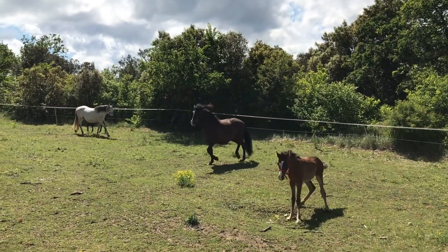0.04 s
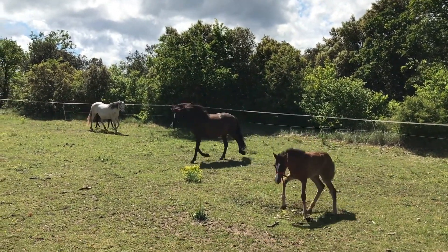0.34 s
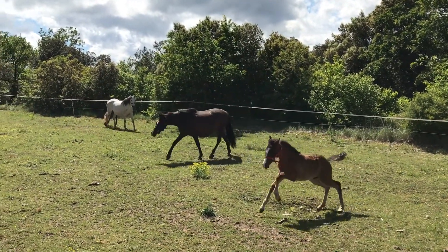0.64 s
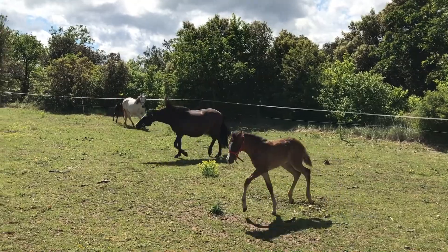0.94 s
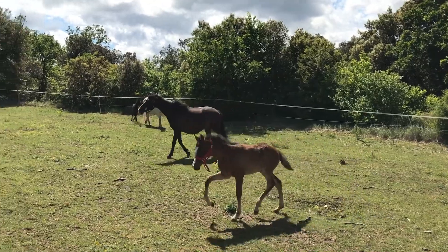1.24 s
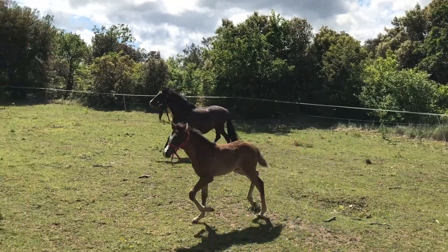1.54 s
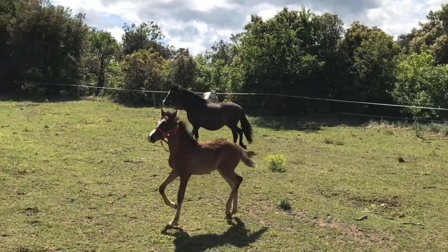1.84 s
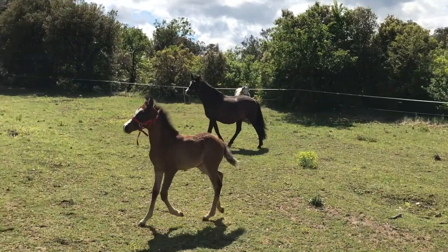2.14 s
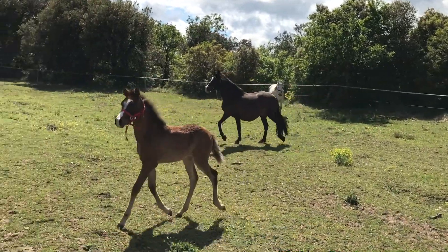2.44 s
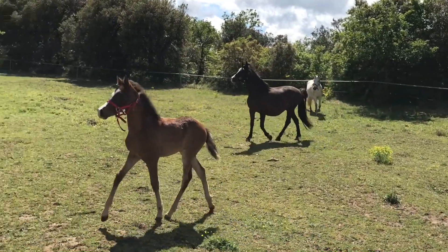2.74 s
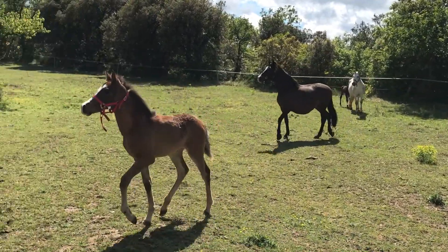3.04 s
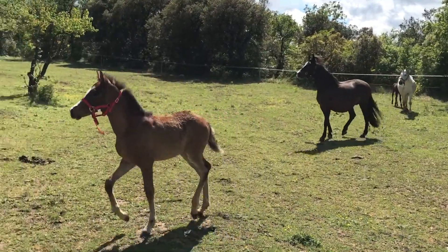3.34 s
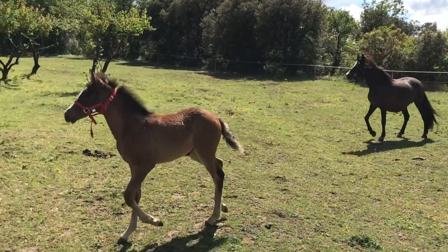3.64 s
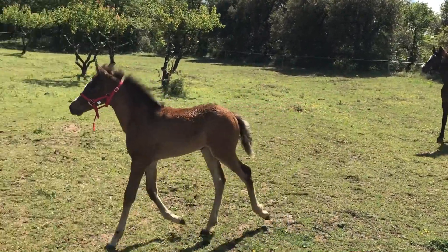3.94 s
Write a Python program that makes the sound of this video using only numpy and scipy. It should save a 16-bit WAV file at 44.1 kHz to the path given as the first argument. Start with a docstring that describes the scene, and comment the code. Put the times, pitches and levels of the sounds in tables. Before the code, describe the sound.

A distant horse whinnies over gusting wind, after a foal's light hoof knocks and halter jingles.

```python
"""A dry, windy field with a tree line. A foal trots past: hooves knock on hard turf, stalks swish and
snap, and the metal rings of its halter jingle. Gusts rumble and buffet the microphone.
From two seconds on a horse whinnies far off with two voices at once: a high whistle, then a shaking
low voice under it, echoed by the trees. Small birds call faintly over a hiss of foliage."""
import sys
import numpy as np
from scipy import signal
from scipy.fft import rfft, irfft
from scipy.io import wavfile
from scipy.ndimage import uniform_filter1d

SR = 44100
rng = np.random.default_rng(int(sys.argv[2]) if len(sys.argv) > 2 else 0)


def to_wav(s):
    """Save 16-bit WAV."""
    ch = np.atleast_2d(s).T  # columns
    pcm = np.round(np.clip(ch, -1, 1) * 32767)  # PCM
    wavfile.write(sys.argv[1], SR, pcm.astype(np.int16))


N = 176400

# Tone of the distant leaves. Each row: frequency in Hz, gain in dB.
FOLIAGE_EQ = [(240, -45), (400, -2), (1100, -3.5), (1850, -7.5), (4030, -13), (4840, -17), (6580, -16.5),
              (12100, -23.5), (15500, -26)]
# Bird whistles. Each row: start and length in seconds, first and last pitch in Hz, level in dB.
BIRD_CALLS = [(0.165, 0.07, 2300, 2256, -70), (0.611, 0.071, 1715, 1660, -77),
              (1.318, 0.29, 5500, 5150, -86), (3.247, 0.24, 6960, 6970, -80),
              (3.607, 0.14, 7290, 7050, -84.5), (3.75, .16, 7060, 7040, -87),
              (3.945, 0.077, 5500, 5720, -80)]

# Rise and fall of the wind. Each row: time in seconds, rumble level in dB.
GUSTS = [(0.0, -40), (0.58, -43), (0.61, -30.5), (0.66, -34), (0.69, -48), (1.0, -55.5), (1.04, -46),
         (1.12, -56.5), (1.3, -41.5), (1.43, -51), (1.46, -36), (1.54, -34), (1.73, -34.5), (1.9, -29),
         (2.05, -46), (2.08, -37), (2.32, -42), (2.71, -41), (2.81, -32.5), (2.83, -37), (2.92, -31.5),
         (3.11, -47), (3.22, -42.5), (3.42, -47.5), (3.64, -37), (3.69, -29), (3.74, -35), (3.78, -28.5),
         (3.97, -40.5), (4.0, -36.5)]
# Tone of the wind rumble. Each row: frequency in Hz, gain in dB.
RUMBLE_EQ = [(20, 4), (35, -5.5), (52, 7), (75, 7), (130, -3.5), (200, -12), (300, -24.5), (450, -41),
             (900, -75.5), (3000, -114)]
# Sharp slaps of wind. Each row: start and length in seconds, level in dB, upper edge in Hz.
BUFFETS = [(0, 0.086, -44.5, 320), (0.239, 0.054, -42.5, 238), (0.599, 0.092, -39.5, 257),
           (1.29, 0.038, -42.5, 328), (1.54, 0.18, -38.5, 276), (1.671, 0.047, -37, 400),
           (1.704, 0.028, -36.5, 410), (1.752, 0.16, -36, 308), (1.858, 0.015, -31, 530),
           (1.87, 0.14, -42, 263), (2.07, 0.053, -39, 292), (2.723, 0.067, -42, 330),
           (2.795, 0.013, -32.5, 390), (2.876, 0.027, -39, 333), (2.912, 0.076, -59, 257),
           (3.651, 0.075, -36.5, 284), (3.738, 0.015, -41.5, 620), (3.752, 0.035, -25.5, 480),
           (3.81, 0.041, -34, 323), (3.846, 0.059, -44.5, 275)]

# Melody of the horse's high voice. Each row: time in seconds, pitch in Hz.
WHISTLE_PITCH = [(2.06, 1500), (2.1, 1720), (2.15, 1815), (2.33, 1860), (2.45, 1980), (2.6, 2040),
                 (2.9, 1935), (3.3, 1879), (3.75, 1792), (3.87, 1600), (4.0, 1496)]
# Envelope of the high voice. Each row: time in seconds, relative level in dB.
WHISTLE_LEVEL = [(2.0, -130), (2.06, -72), (2.14, -62), (2.21, -58), (2.33, -55.5), (2.44, -66), (2.7, -63),
                 (2.94, -60.5), (3.2, -61.5), (3.55, -60), (3.76, -63.5), (4.0, -69)]
# Overtone about a fifth above the high voice. Each row: time in seconds, relative level in dB.
OVERTONE_LEVEL = [(2.1, -100), (2.25, -74), (2.42, -72.5), (2.68, -76), (2.9, -68), (4.0, -93)]
# The horse's low voice. Each row: time in seconds, pitch in Hz, relative level in dB.
LOW_VOICE = [(2.05, 480, -130), (2.12, 485, -80), (2.42, 514, -63.5), (2.58, 491.5, -59.5),
             (2.85, 420.5, -61), (3.1, 400, -60), (3.4, 386.2, -58), (3.75, 362.8, -62), (3.88, 311, -63),
             (4.0, 310, -75.5)]
# Throat resonances. Each row: base frequency in Hz, width in Hz, gain in dB.
FORMANTS = [(400, 78, -6), (627, 34, 1.5), (1295, 158, -2.5), (1600, 96, -5), (1873, 185, -3),
            (2300, 71, -5), (2960, 108, -6.5), (3285, 490, -10.5), (4117, 100, -11)]
# Tuning of the throat. Each row: time in seconds, factor on the resonance frequencies.
THROAT_TUNING = [(2.1, 0.79), (2.48, 1.035), (2.7, 0.97), (3.0, 1.046), (3.5, .995), (4.0, 0.94)]
# Shakes of the whinny. Each row: time of the crest in seconds, accent on the whistle in dB.
SHAKES = [(2.42, 2.5), (2.56, -2), (2.69, 1.5), (2.82, 3), (2.955, 5.5), (3.09, -1), (3.23, -1.5),
          (3.36, -1), (3.495, 3), (3.63, -0.5), (3.76, 1), (3.89, 1.5), (4.03, -3)]

# Strides through grass. Each row: start and length in seconds, relative stalk and turf levels in dB.
SWISHES = [(0.051, 0.048, -63, -78), (0.07, 0.17, -70, -71), (0.464, 0.12, -71.5, -62.5),
           (0.784, 0.041, -69, -63.5), (0.824, 0.15, -74.5, -63), (0.964, 0.11, -69, -57),
           (1.05, 0.079, -68.5, -63.5), (1.173, 0.046, -72, -68), (1.273, 0.033, -68, -72.5),
           (1.401, 0.18, -78.5, -66), (1.796, 0.046, -71, -62.5), (2.118, 0.078, -78.5, -70),
           (2.293, 0.14, -79, -97), (2.717, 0.19, -72, -84), (2.937, 0.064, -64.5, -63.5),
           (3.209, 0.041, -67.5, -80), (3.6, 0.065, -74.5, -63.5)]
# Tone of the crackling stalks. Each row: frequency in Hz, gain in dB.
STALK_EQ = [(2000, -8), (3000, 4.5), (4200, 3), (7000, -3.5), (10000, -5), (15000, -4.5)]
# Tone of the scuffed turf. Each row: frequency in Hz, gain in dB.
TURF_EQ = [(300, -3), (700, -9), (1100, 8.5), (1600, 2.5), (2300, -3), (4000, -11.5), (9000, -72)]
# Breaking stalks. Each row: start in seconds, level in dB, low and high edge in Hz, decay in seconds.
SNAPS = [(0.053, -57, 1500, 7450, 0.0055), (0.0965, -59.5, 2000, 14900, 0.00051),
         (0.169, -65, 3000, 12000, 0.0065), (0.482, -57, 2500, 14000, 0.0044),
         (1.021, -62, 3000, 14000, .004), (1.066, -62, 3000, 11000, .006),
         (1.276, -66, 3000, 14900, 0.0016), (1.823, -62.5, 3550, 12000, 0.0043),
         (2.864, -60, 2500, 9900, .003), (2.949, -68, 3000, 10000, 0.0018)]
# Hoof knocks. Each row: start in seconds, level in dB, rough centre in Hz, decay in seconds.
HOOF_KNOCKS = [(0.054, -59, 1520, 0.074), (.172, -57, 2350, 0.0067), (0.404, -44, 1780, 0.00089),
               (.795, -52, 890, 0.0037), (1.182, -54, 1000, 0.0036), (1.756, -40.5, 1100, 0.0029),
               (2.078, -61, 1020, 0.0035), (3.224, -47, 990, 0.002), (3.768, -49.5, 940, 0.0057)]
# Modes of the halter's metal. Each row: part (0 and 1 are rings, 2 is the buckle), frequency in Hz,
# gain in dB, seconds to fall by 60 dB.
HALTER_MODES = [(0, 6263, 0, .25), (0, 6291, -2, .2), (0, 6150, -4, .025), (0, 11520, -4, .03),
                (0, 11637, -3, .05), (0, 11795, -2, .06), (1, 6434, -5, .06), (1, 6575, -2, .07),
                (1, 6610, 0, .08), (1, 6720, -4, .03), (1, 12200, -3, .05), (1, 12326, -3, .05),
                (1, 12520, -5, .025), (2, 5190, 0, .055), (2, 9158, -9, .045)]
# Clinks. Each row: start and rattle decay in seconds, levels of first ring, second ring, buckle in dB.
CLINKS = [(0.038, 0.004, -69.5, -73, -99), (0.407, 0.05, -88, -53.5, -99), (0.448, 0.011, -75, -53.5, -99),
          (0.482, 0.032, -69, -79, -99), (0.684, 0.0093, -81, -66.5, -99),
          (0.7047, 0.0058, -50, -57.5, -86), (0.757, 0.047, -73, -68, -99), (0.827, 0.016, -72, -66, -99),
          (0.884, 0.033, -66, -81, -99), (0.904, 0.031, -56, -64, -99), (0.952, 0.0059, -59, -61, -99),
          (.996, 0.018, -51.5, -74, -84), (1.009, 0.0059, -55, -47.5, -51), (1.043, 0.057, -56, -60, -99),
          (1.095, 0.0072, -67, -60, -88), (1.165, 0.0087, -63.5, -88, -99), (1.202, 0.0086, -57, -67, -99),
          (1.3, 0.0026, -56, -66, -99), (1.342, 0.006, -68, -71, -99), (1.516, 0.022, -78, -71, -99),
          (2.037, 0.0041, -77, -68, -99), (2.188, 0.042, -64.5, -74, -99), (2.354, 0.016, -71.5, -82, -79),
          (2.417, 0.0028, -83, -71.5, -99), (3.121, 0.0071, -68, -74, -99),
          (3.149, 0.0015, -66, -68.5, -99)]


def undb(db):
    """Decibels to gain."""
    return 10 ** (np.asarray(db) / 20)


def unit(x):
    """Scale to rms 1."""
    return x / np.sqrt(np.mean(x ** 2) + 1e-20)


def curve(table, axis=1):
    """One column of a table, joined by straight lines in time."""
    rows = np.array(table)
    return np.interp(np.arange(N) / SR, rows[:, 0], rows[:, axis])


def add(out, start, x):
    """Mix a sound in at its start time."""
    i = max(int(start * SR), 0)
    out[i:i + len(x)] += x[:max(len(out) - i, 0)]


def colour(x, points):
    """EQ a sound through (Hz, dB) points."""
    hz, db = np.array(points).T
    f = np.fft.rfftfreq(len(x), 1 / SR) + 1
    return irfft(rfft(x) * undb(np.interp(np.log(f), np.log(hz), db)), len(x))


def band(x, lo_hz, hi_hz, order=2):
    """Causal band-pass."""
    sos = signal.butter(order, [lo_hz, min(hi_hz, SR / 2 - 1)], "band", fs=SR, output="sos")
    return signal.sosfilt(sos, x)


def resonance(x, hz, width):
    """Band-pass whose centre moves."""
    turn = np.exp(2j * np.pi * np.cumsum(hz) / SR)
    return np.real(turn * signal.sosfilt(signal.butter(2, width / 2, fs=SR, output="sos"), x / turn))


def wander(per_s):
    """Smooth random modulation at rms 1."""
    hold = int(SR / per_s)
    steps = rng.standard_normal(N)[np.arange(N) // hold]
    return unit(uniform_filter1d(uniform_filter1d(steps, hold), hold))


def swell(length):
    """A rounded rise and fall."""
    return unit(np.sin(np.linspace(0, np.pi, int(length * SR))))


def foliage(level_db=-71):
    """A soft bed of hiss from distant leaves."""
    return unit(colour(rng.standard_normal(N), FOLIAGE_EQ)) * undb(level_db + 0.75 * wander(5.2))


def birds(waver_depth=0.0052):
    """Thin gliding whistles with a slight waver."""
    out, waver = np.zeros(N), 1 + waver_depth * wander(130)
    for start, length, from_hz, to_hz, db in BIRD_CALLS:
        shape = swell(length)
        hz = np.linspace(from_hz, to_hz, len(shape)) * waver[:len(shape)]
        add(out, start, undb(db) * shape * unit(np.sin(2 * np.pi * np.cumsum(hz) / SR)))
    return out


def wind(lull_db=-55.5, buffet_peak_hz=124, flutter_db=7.5, low_cut_hz=30):
    """Rumble on the microphone, brighter in gusts, with fluttering buffets on top."""
    gust_db, flow = curve(GUSTS), colour(rng.standard_normal(N), RUMBLE_EQ)
    flow /= np.sqrt(uniform_filter1d(flow ** 2, SR // 10) + 1e-20)  # held even, so the gusts lead
    upper = signal.sosfiltfilt(signal.butter(2, 140, "high", fs=SR, output="sos"), flow)
    brightness = undb(0.18 * (gust_db - lull_db) + 4 * wander(30.38))
    out = (flow - upper + upper * brightness) * undb(gust_db)
    for start, length, db, top_hz in BUFFETS:
        eq = [(buffet_peak_hz / 3, -20), (buffet_peak_hz, 0), (top_hz * 0.73, -3),
              (top_hz * 1.247, -15), (top_hz * 1.91, -32), (top_hz * 8, -70), (top_hz * 20, -100)]
        shape = swell(length)
        eddies = colour(rng.standard_normal(SR // 2), eq)[:len(shape)]
        flutter = undb(flutter_db * np.tanh(wander(176)))[:len(shape)]
        add(out, start, undb(db) * unit(eddies * flutter * shape))
    return signal.sosfilt(signal.butter(5, low_cut_hz, "high", fs=SR, output="sos"), out)


def trees(x, t60_s=0.68, wet_db=-1.5):
    """The direct sound plus its diffuse echo from the tree line."""
    t = np.arange(SR) / SR
    tail = rng.standard_normal(SR) * undb(-60 * t / t60_s) * (1 - np.exp(-t / 0.0027))
    return x + undb(wet_db) * signal.fftconvolve(x, tail / np.linalg.norm(tail))[:N]


def low_voice(phase, bend, roughness=0.8):
    """Buzzy pulses and puffs of breath ring the shifting resonances of the throat."""
    pulses = unit(sum(np.cos(k * phase) for k in range(1, 14)))
    breath = roughness * (1 + np.cos(phase)) * rng.standard_normal(N)
    tuning = curve(THROAT_TUNING) * (1 + 0.005 * bend + 0.004 * wander(14))
    voice = sum(undb(db) * resonance(pulses + breath, hz * tuning, width) for hz, width, db in FORMANTS)
    return unit(voice) * undb(curve(LOW_VOICE, axis=2))


def high_voice(phase, low_phase, shaking, rasp_depth=0.5, overtone_ratio=1.515):
    """A whistle and its overtone; as the shaking sets in, it rasps and the low voice adds a sideband."""
    tone = np.sin(phase) * undb(curve(SHAKES))
    sideband = band(np.sin(phase + low_phase), 2184, 2400, order=1) * undb(-2.5 + 4.2 * wander(21.927))
    rasp = 1 + rasp_depth * shaking * wander(110)
    whistle = (tone + np.sqrt(shaking) * sideband) * rasp * undb(curve(WHISTLE_LEVEL))
    overtone = np.sin(overtone_ratio * phase + 1.1 * wander(130)) * undb(curve(OVERTONE_LEVEL))
    return np.sqrt(2) * (whistle + overtone)


def whinny(trim_db=-6, shake_db=1, shake_from_s=2.42, shake_full_s=2.62, bend_lag_rad=0.19):
    """A horse sounds two voices at once; each shake swells them and bends them upward."""
    t = np.arange(N) / SR
    shaking = np.clip((t - shake_from_s) / (shake_full_s - shake_from_s), 0, 1)
    cycle = 2 * np.pi * np.interp(t, np.array(SHAKES)[:, 0], np.arange(len(SHAKES)))
    tremolo, bend = shaking * np.cos(cycle), shaking * np.cos(cycle - bend_lag_rad)
    jitter = (0.00498 + 0.01 * shaking) * wander(160) + 0.00605 * shaking * wander(18)
    high_hz = curve(WHISTLE_PITCH) * (1 + 0.026 * bend + jitter)
    low_hz = curve(LOW_VOICE) * (1 + 0.0201 * bend + 0.026 * wander(90))
    high_phase, low_phase = 2 * np.pi * np.cumsum([high_hz, low_hz], axis=1) / SR
    voices = low_voice(low_phase, bend) + high_voice(high_phase, low_phase, shaking)
    return voices * undb(trim_db + shake_db * tremolo)


def grass(bed_db=-78, grains_per_band_s=1300, spread_db=1.5):
    """At each stride a faint bed of crackling dry stalks swells over a soft scuff of turf."""
    stalk_gain, turf_gain, crackle = np.full(N, undb(bed_db)), np.zeros(N), np.zeros(N)
    for start, length, stalk_db, turf_db in SWISHES:
        add(stalk_gain, start, undb(stalk_db) * swell(length))
        add(turf_gain, start, undb(turf_db) * swell(length))
    for hz in np.linspace(2500, 14500, 9):
        grains = (rng.random(N) < grains_per_band_s / SR) * rng.standard_normal(N)
        accents = undb(spread_db * np.minimum(rng.exponential(size=N), 6))
        crackle += band(grains * accents, hz - 1100, hz + 1100, order=1)
    scuff = unit(colour(rng.standard_normal(N), TURF_EQ)) * undb(-5 + 5.6 * np.tanh(wander(110)))
    stalks = unit(colour(crackle, STALK_EQ) * undb(4.5 * np.tanh(wander(130))))
    return stalks * stalk_gain + scuff * turf_gain


def snaps():
    """Single stalks break under the hooves in a brief spray of cracks."""
    out, t = np.zeros(N), np.arange(SR // 10) / SR
    for start, db, lo_hz, hi_hz, decay in SNAPS:
        crack = band(rng.laplace(size=len(t)) * np.exp(-t / decay), lo_hz, hi_hz, order=1)
        add(out, start, undb(db) * crack / np.std(crack[:SR // 200]))
    return out


def hooves(tail_db=-25.5, tail_s=0.021):
    """Each hoof lands on hard turf: a dry knock with a short crumbling tail."""
    out, t = np.zeros(N), np.arange(SR // 5) / SR
    for start, db, hz, decay in HOOF_KNOCKS:
        blow = rng.standard_normal(len(t)) * (np.exp(-t / decay) + undb(tail_db) * np.exp(-t / tail_s))
        knock = band(band(blow, hz * 0.5, hz * 1.32, order=1), 160, hz * 1.86)
        add(out, start, undb(db) * knock / np.std(knock[:SR // 200]))
    return out


def struck_metal(part, t, scatter):
    """One ring or the buckle rings out; scatter nudges each mode's level and pitch."""
    return sum(undb(db + 2 * accent - 60 * t / t60) * np.sin(2 * np.pi * (hz + 3 * detune / t60) * t)
               for (owner, hz, db, t60), (accent, detune) in zip(HALTER_MODES, scatter) if owner == part)


def halter(contacts_per_s=800, graze_db=-33, graze_s=0.06, tick_db=-23, tick_s=0.006):
    """Each clink is a short rattle of contacts that sets two rings and a buckle ringing."""
    out, t = np.zeros(N), np.arange(SR // 2) / SR
    grazing = undb(graze_db) * np.exp(-t / graze_s)  # the rings keep touching after a clink
    for start, decay, *levels in CLINKS:
        contacts = (rng.random(len(t)) < contacts_per_s / SR) * rng.standard_normal(len(t))
        hits = 0.56 * contacts * (np.exp(-t / decay) + grazing)
        hits[0] = 1  # the opening strike
        burst = rng.standard_normal(len(t)) * np.exp(-t / tick_s)
        scatter = rng.standard_normal((len(HALTER_MODES), 2))
        for part, db in enumerate(levels):
            ring = signal.fftconvolve(hits, struck_metal(part, t, scatter))[:len(t)]
            add(out, start, undb(db) * ring / np.std(ring[:SR // 40]))
        tick = band(signal.fftconvolve(hits, burst)[:len(t)], 7600, 9900, order=1)
        add(out, start, undb(max(levels) + tick_db) * tick / np.std(tick[:SR // 40]))
    return out


def scene():
    """The far voices, the near foal and the breeze, mixed in mono."""
    far_voices = trees(whinny()) + birds()
    foal = snaps() + halter() + hooves() + grass()
    return (far_voices + foal + wind() + foliage())[None]


def record(dry):
    """A steep low-pass takes off the very top."""
    top_hz = 15850
    return signal.sosfilt(signal.ellip(10, 0.2, 70, top_hz, fs=SR, output="sos"), dry)


dry = scene()
out = record(dry)
to_wav(out)
```